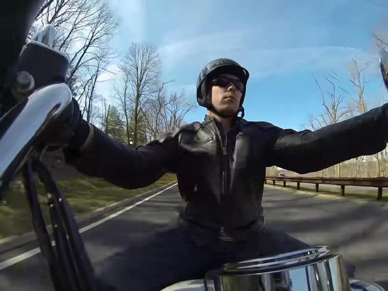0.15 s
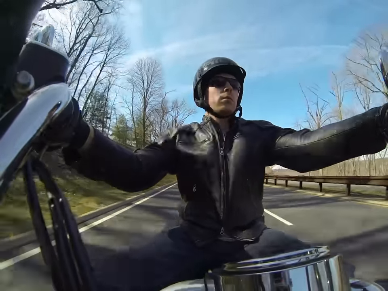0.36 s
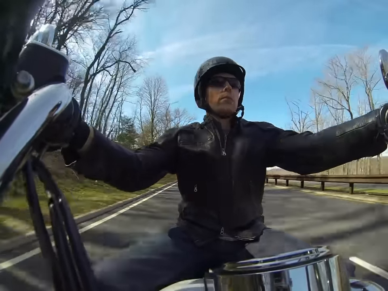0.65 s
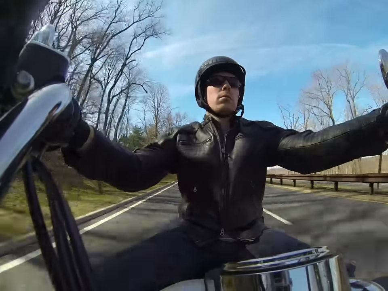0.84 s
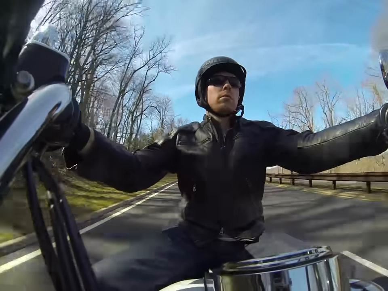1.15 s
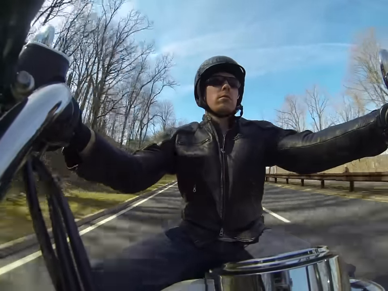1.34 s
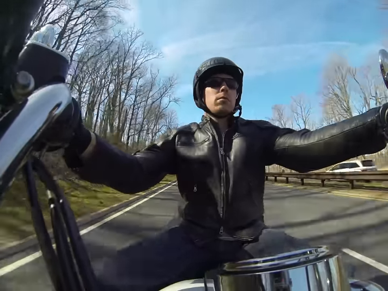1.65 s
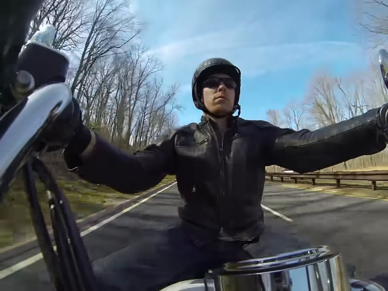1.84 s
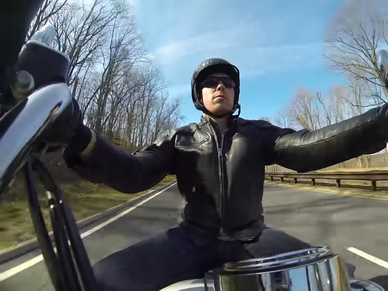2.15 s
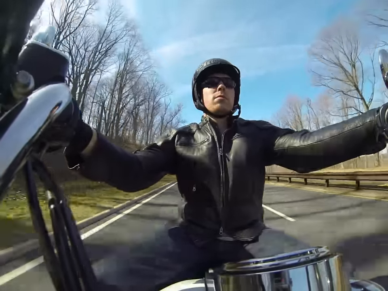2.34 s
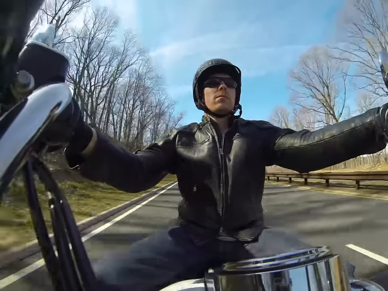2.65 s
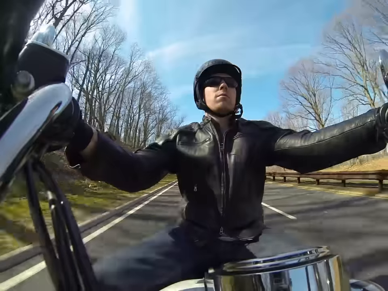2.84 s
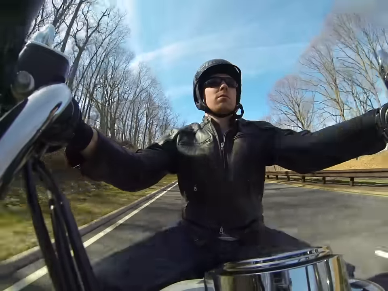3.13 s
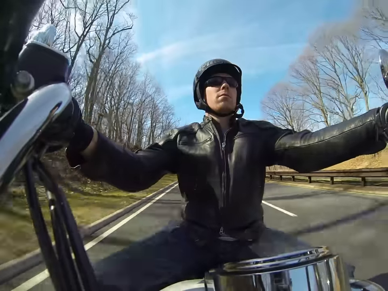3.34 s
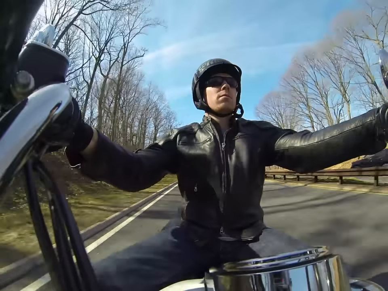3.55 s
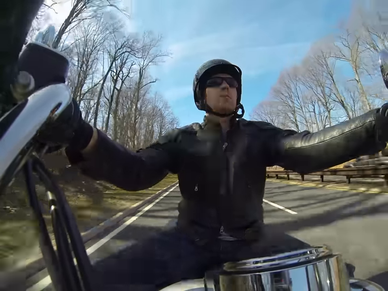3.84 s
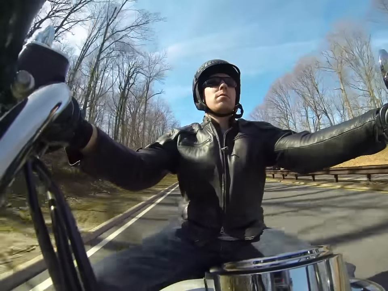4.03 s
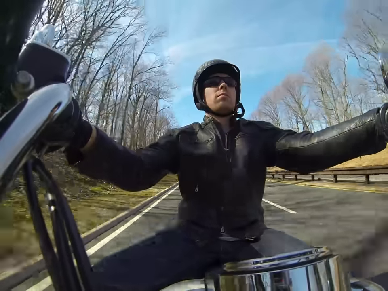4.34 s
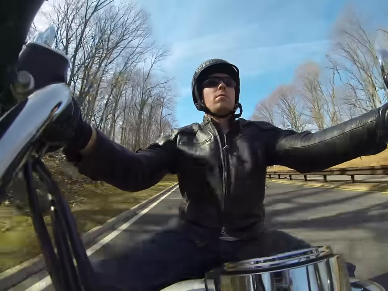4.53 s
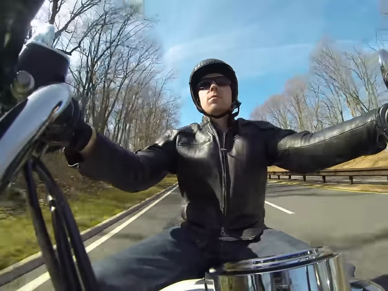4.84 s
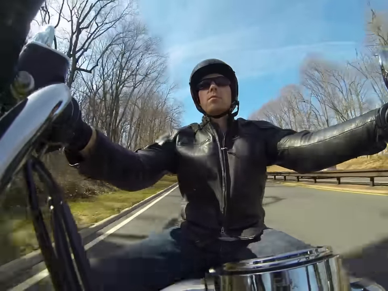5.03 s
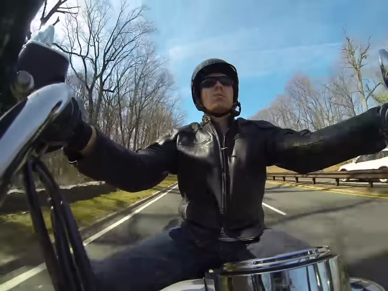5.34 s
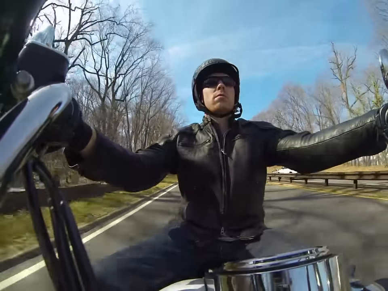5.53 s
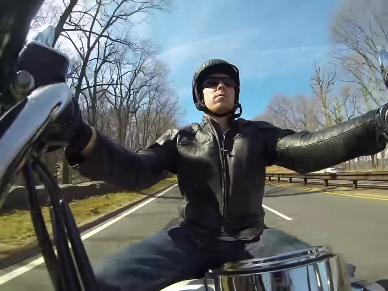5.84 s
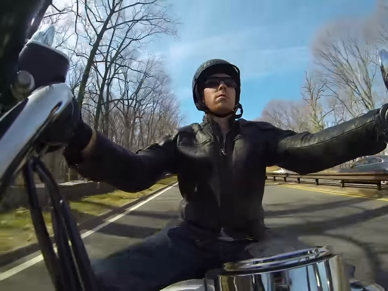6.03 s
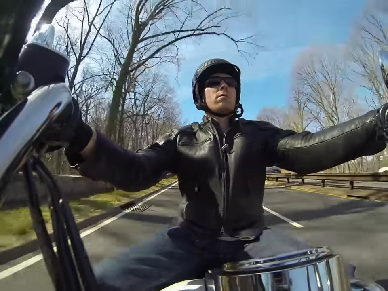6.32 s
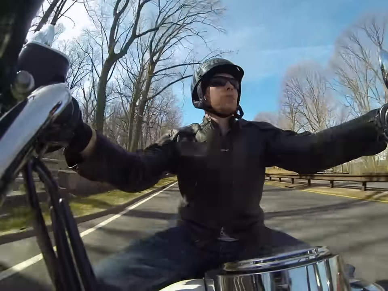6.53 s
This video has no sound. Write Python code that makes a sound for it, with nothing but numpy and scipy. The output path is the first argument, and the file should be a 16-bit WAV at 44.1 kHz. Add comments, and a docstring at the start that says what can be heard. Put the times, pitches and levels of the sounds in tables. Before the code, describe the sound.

A twin-cylinder motorcycle runs on an open road, heard from a small sealed microphone on the handlebar. It coasts and slows slightly, then the throttle opens and the uneven exhaust throb grows stronger before easing off. Wind roar and hollow valve clatter continue throughout, and low jolts from road joints shake the bar near the end.

```python
"""A V-twin motorcycle on a road, heard by a small microphone in a sealed housing on the handlebar.
It coasts and slows, pulls under opened throttle, eases off, and slows over jolting joints.
Throughout, two uneven firings a cycle excite pipe and frame resonances, and engine orders shake the bar.
Wind noise and valve knocks ring the housing modes, coloured noise roars, and low hums swell and beat.
A gain control ducks loud swings, above all of the bass; the housing dulls the treble."""
import sys
import numpy as np
from scipy import signal
from scipy.fft import rfft, irfft
from scipy.io import wavfile
from scipy.ndimage import uniform_filter1d

SR = 44100
rng = np.random.default_rng(int(sys.argv[2]) if len(sys.argv) > 2 else 0)


def wav_out(sig):
    """Save sig, one row per channel (or a flat mono array), as 16-bit PCM at SR to the path in sys.argv[1]."""
    wavfile.write(sys.argv[1], SR, np.round(np.clip(np.atleast_2d(sig).T, -1, 1) * 32767).astype(np.int16))


N = 294588

# Source levels are those ahead of the gain control.
# whines of gear teeth: (multiple of the cycle rate)
GEAR_ORDERS = (42, 72, 77)


def amp(db):
    """Level to amplitude ratio: 20 dB is a factor of ten."""
    return 10 ** (np.asarray(db) / 20)


def rms_one(x):
    """Normalization to unit root-mean-square amplitude."""
    return x / np.sqrt(np.mean(x ** 2) + 1e-20)


def in_time(rows):
    """Linear interpolation of each column of a table over time."""
    times, *columns = np.transpose(rows)
    return [np.interp(np.arange(N) / SR, times, column) for column in columns]


def drift(corner_hz):
    """Slow random modulation of spread 1: noise at every 40th sample through a double one-pole low-pass."""
    r = np.exp(-80 * np.pi * corner_hz / SR)
    noise = rng.standard_normal(N // 40 + 2002)
    slow = signal.lfilter([1], [1, -2 * r, r * r], noise)[2000:]   # settled part
    return np.interp(np.arange(N) / 40, np.arange(len(slow)), rms_one(slow))


def swell(middle_s, length_s):
    """Raised-cosine envelope: rises smoothly from 0 to 1 and falls back."""
    place = (np.arange(N) / SR - middle_s) / length_s
    return np.cos(np.pi * np.clip(place, -.5, .5)) ** 2


def resonate(x, hz, width_hz):
    """Damped resonance: a pole pair with unit gain at its peak, damping set by the bandwidth."""
    r = np.exp(-np.pi * width_hz / SR)
    zeros = [(1 - r * r) / 2, 0, (r * r - 1) / 2]
    poles = [1, -2 * r * np.cos(2 * np.pi * hz / SR), r * r]
    return signal.lfilter(zeros, poles, x)


def each_cycle(cycles, place, spread_db, jitter_s):
    """Quasi-periodic impulses: one click a cycle, each a little off in strength and time."""
    at = np.searchsorted(cycles, np.arange(int(cycles[-1])) + place % 1)
    chance = rng.standard_normal((len(at), 2)).clip(-2, 2)
    at = at + (jitter_s * SR * chance[:, 0]).astype(int)
    clicks = np.full(N, 1e-18)
    clicks[np.clip(at, 0, N - 1)] = amp(spread_db * chance[:, 1])
    return clicks


def in_stages():
    """Piecewise-steady operation: every column holds through its stage, then moves linearly to the next."""
    # coasting, slowing ends, throttle opens, pulling, easing off, light throttle, slowing:
    # (start [s], exhaust pop [dB], second cylinder's pop re first [dB], frame ring [dB],
    # second blow re first [dB], orders 2, 3, 4, 5, 42, 72 and 77 [dB each], housing noise [dB],
    # its modes away from 1350 Hz [dB per octave])
    stages = [(0, -33, -7, -22, -1, -35, -36, -21, -44.5, -42.5, -27, -49.5, -19.5, 1.5),
              (.75, -31, -5, -18.5, 1.5, -34, -39, -22, -44, -37, -31, -45.5, -18.5, 2.5),
              (1.25, -27, -5, -26.5, -3, -34, -31, -25, -40, -40, -53, -53, -22.5, 1.4),
              (1.651, -23, -7, -19.5, -3.5, -35, -26.5, -30, -34.5, -43, -42.5, -38, -19, 2.3),
              (4.101, -24.5, -6, -30.5, -4, -38, -27, -23, -38, -39, -35.5, -33.5, -19.5, 2.8),
              (4.902, -25.5, -12, -31, 2, -42, -30, -20, -35, -37, -53, -42, -18.5, 1.9),
              (5.799, -26, -12, -33, 2, -41, -30, -18, -33, -39, -53, -45, -19.5, 2.4)]
    change_s = 0.18   # the blend ends as the next stage starts
    ends = [row[0] - change_s for row in stages[1:]] + [N / SR]
    rows = []
    for row, end in zip(stages, ends):
        rows.append(row)
        rows.append((max(end, row[0] + .01), *row[1:]))
    return in_time(rows)


def roar():
    """Broadband turbulence and tyre noise: white noise spectrally coloured on a log-frequency axis."""
    # wind and tyre roar between the modes: (frequency [Hz], relative spectral level [dB])
    spectrum = [(12, -7.5), (24, -10), (45, -18.5), (61, -3.5), (78, -16.5), (108, -20.5), (140, -18),
                (290, -19), (520, -21), (620, -39.5), (750, -32.5), (1010, -40), (1370, -17), (2400, -50),
                (4600, -63)]
    hz, db = np.transpose(spectrum)
    grid = np.maximum(np.arange(N // 2 + 1) * SR / N, 1)
    colour = amp(np.interp(np.log(grid), np.log(hz), db, left=-40, right=-120))
    noise = irfft(rfft(rng.standard_normal(N)) * colour, N)
    return rms_one(noise) * amp(2.5 * drift(6.0))


def housing(cycles, tilt_db):
    """Modal superposition: wind noise rings every mode; valve knocks strike the middle modes each cycle."""
    # valve gear: (place in the cycle [0-1], knock into low, middle and upper mode groups [dB each])
    valves = [(.02, 0, -8, -12), (.31, -8, -1, -9), (.42, 1, -20, -20), (.625, -4, 0, -12),
              (.8, -8, -5, -4)]
    # edges of those three groups of modes: (frequency [Hz])
    group_edges = (600, 1000, 1700, 2400)
    # housing modes: (frequency [Hz], width of the first resonance pass [Hz], relative gain [dB])
    modes = [(292, 60, -2), (445, 85, -13.5), (762, 87, -14.5), (900.7, 92, -13.5), (1178, 150, -16),
             (1270, 55, -3), (1325, 70, -3), (1385, 90, 0), (1527.5, 130, -12), (2009, 152, -14),
             (2148, 124, -17), (2769, 210, -22), (3335, 320, -31.5), (3822, 100, -37), (4240, 130, -38),
             (5046, 440, -41.5), (5600, 590, -45), (7200, 620, -29.5), (7670, 76, -22)]
    decay_s, spread_db, jitter_s = .003, 2.5, .00003
    knock_gain_db, rattle_db = 24, 1   # knock, and its rattling tail on the wind noise

    fade = np.exp(-1 / (decay_s * SR))
    clicks = np.array([each_cycle(cycles, row[0], spread_db, jitter_s) for row in valves])
    group_knocks = amp(np.array(valves)[:, 1:]).T @ clicks
    knocks = [np.zeros(N), *group_knocks, np.zeros(N)]   # none below or above the groups
    white, gust, out = rng.standard_normal((3, N)), drift(27.0), 0
    for k, (hz, width, db) in enumerate(modes):
        knock = knocks[np.searchsorted(group_edges, hz)]
        rattle = 1 + amp(rattle_db) * signal.lfilter([1], [1, -fade], knock + 1e-18)
        flutter = amp(0.67 * gust + 0.5 * drift(16.0))   # shared and own parts
        wind = white[k % 3] * rattle * flutter
        force = wind + amp(knock_gain_db) * knock * (-1) ** k   # neighbours move in opposite sense
        gain = amp(db + tilt_db * abs(np.log2(hz / 1350)))
        out = out + gain * resonate(resonate(force, hz, width), hz, 0.93 * width)   # twice: steep skirts
    return rms_one(out)


def faint_clicks():
    """Impulse response: each faint short click is one impulse ringing briefly near 3.2 kHz."""
    # faint short clicks: (time [s], peak level [dB])
    click_table = [(1.4942, -32), (1.737, -30), (1.7736, -26.5), (1.8494, -32), (1.962, -31), (2.1557, -31),
                   (2.227, -30), (2.5218, -37), (2.7433, -37), (2.842, -29), (2.9548, -33), (3.2696, -33),
                   (3.3954, -30), (3.5101, -32), (3.6213, -30), (3.7341, -41), (3.8563, -34), (3.911, -31)]
    centre_hz, width_hz = 3236, 300
    times, peak_db = np.transpose(click_table)
    impulses = np.full(N, 1e-18)
    # this factor and e set the peak of the double resonance
    impulses[(times * SR).astype(int)] = amp(peak_db) * SR / (2 * np.pi * width_hz)
    return np.e * resonate(resonate(impulses, centre_hz, width_hz), centre_hz, width_hz)


def jolts():
    """Transient free vibration: each joint kicks the bar's low mode downward first; it rings out."""
    # joints in the road jolt the bar: (time [s], level before rise and decay [dB])
    joints = [(5.366, -8), (5.548, -15), (5.891, -10.5), (6.461, -15)]
    mode_hz, width_hz, rise_s = 61, 4, .004
    since = np.maximum(np.arange(N) / SR - np.array(joints)[:, :1], 0)
    envelope = (1 - np.exp(-since / rise_s)) * np.exp(-np.pi * width_hz * since)
    return -amp(np.array(joints)[:, 1]) @ (envelope * np.sin(2 * np.pi * mode_hz * since))


def low_hum_swells():
    """Beating: low hum swells near 59-67 Hz overlap and interfere with the fourth engine order."""
    # low hum swells: (middle [s], length [s], frequency [Hz], RMS level at the top before drift [dB])
    hums = [(.3441, 1.0, 65, -18.5), (.7514, 1.0, 59, -25.5), (1.6125, 1.0, 60.5, -19),
            (2.5108, 1.0, 66, -23.5), (2.9461, .7, 61, -23), (3.3772, .45, 63, -22),
            (3.8192, .45, 59, -18.5), (3.8343, 1.0, 66.5, -24), (4.5437, 1.0, 66, -19),
            (4.7192, .7, 62.5, -21.5), (5.1392, .3, 59.5, -22), (5.3657, 1.0, 65.5, -18.5),
            (5.7043, .3, 65, -21), (6.3187, 1.0, 65, -24.5)]
    t = np.arange(N) / SR
    total = 0
    for middle, length, hz, db in hums:
        total = total + amp(db) * swell(middle, length) * np.cos(2 * np.pi * hz * (t - middle))
    return np.sqrt(2) * amp(1.4 * drift(9.1)) * total


def shaking(cycles, order_db):
    """Harmonic forcing: pure multiples of the cycle rate are carried through the bar."""
    # order: angle at the start [turns]
    start_turns = {2: .1, 3: .45, 4: .29, 5: .2, 10: .15, 42: .2, 72: .1, 77: .1}
    total = 0
    for order, db in order_db.items():
        turns = order * cycles + start_turns[order]
        total = total + np.sqrt(2) * amp(db) * np.cos(2 * np.pi * turns)
    return total


def firings(cycles, pop_db, second_db, ring_db, second_blow_db):
    """Pulse-excited resonance: firings pop through pipe modes and, a moment later, swell up in frame modes."""
    # the two firings as heard at the bar: (pop place in the cycle [0-1], frame blow place [0-1])
    firing_places = [(.146, .19), (.685, .69)]
    # exhaust pipe modes: (frequency [Hz], width [Hz], relative gain [dB])
    pipe_modes = [(140, 60, -1), (190, 90, 5), (235, 55, 4), (352, 80, -2), (428, 80, 2.5), (467, 50, 3),
                  (515, 60, -7)]
    # frame modes: (frequency [Hz], width of the first resonance pass [Hz], relative gain [dB])
    frame_modes = [(289, 18, 6), (323, 17, -2)]
    spread_db, jitter_s = 1.8, .0001
    # above this the pop is a bright crack: earlier, echoed once from the pipe end, weaker in the second cylinder
    crack_from_hz, crack_lead_s, second_crack_db = 300, .0015, -8
    echo_s, echo_db = 0.00857, -10.5

    first, second = (each_cycle(cycles, pop, spread_db, jitter_s) for pop, _ in firing_places)
    puffs = first + amp(second_db) * second
    cracks = first + amp(second_db + second_crack_db) * second
    cracks = np.roll(cracks, -int(crack_lead_s * SR))
    cracks = cracks + amp(echo_db) * np.roll(cracks, int(echo_s * SR))
    first, second = (each_cycle(cycles, blow, spread_db, jitter_s) for _, blow in firing_places)
    blows = first + amp(second_blow_db) * second

    pop = 0
    for hz, width, db in pipe_modes:
        source = cracks if hz > crack_from_hz else puffs
        pop = pop + amp(db) * resonate(source, hz, width)
    ring = 0
    for hz, width, db in frame_modes:
        ring = ring + amp(db) * resonate(resonate(blows, hz, width), hz, 5.3 * width)
    soft = signal.butter(6, 545, fs=SR, output="sos")   # gas pulses have no sharp front
    return signal.sosfilt(soft, amp(pop_db) * rms_one(pop) + amp(ring_db) * rms_one(ring))


def scene():
    """Linear superposition of engine, low hums, jolts, air noise and faint clicks."""
    # engine speed: (time [s], four-stroke cycle rate [Hz]); the crank turns twice a cycle
    speed = [(0, 18.808), (.95, 18.056), (1.43, 18.066), (1.9, 17.85), (3.85, 18.042), (6.68, 17.397)]
    # shaking at an unchanging level: order: RMS level [dB]
    steady_orders = {10: -42}
    # orders whose levels follow the stages: (multiple of the cycle rate)
    stage_orders = (2, 3, 4, 5, *GEAR_ORDERS)
    # gusts on the housing: (middle [s], length [s], rise at the middle [dB])
    gusts = [(1.5, 0.68, 5), (4.212, 1, 3)]
    roar_db = -26

    cycles = np.cumsum(in_time(speed)[0]) / SR
    pop_db, second_db, ring_db, second_blow_db, *order_db, housing_db, tilt_db = in_stages()
    housing_db = housing_db + sum(db * swell(middle, length) for middle, length, db in gusts)
    orders = dict(zip(stage_orders, order_db))
    for order in GEAR_ORDERS:   # the teeth load and unload with the slack of the drive
        orders[order] = orders[order] + 3 * drift(12.0)
    engine = firings(cycles, pop_db, second_db, ring_db, second_blow_db)
    engine = engine + shaking(cycles, {**steady_orders, **orders})
    air = amp(housing_db) * housing(cycles, tilt_db) + amp(roar_db) * roar()
    return (engine + low_hum_swells() + jolts() + air + faint_clicks())[None]


def record(dry):
    """Nonlinear transduction: lopsided capsule, fast gain reduction with slow release, rounded peaks, cut top."""
    lopsided = 0.053   # the capsule swings further one way, which doubles the frequency of strong bass
    target_db, share = -7.5, 0.83   # detector level aimed at, part of the deviation removed
    release_db_s, attack_s = 42.5, 0.00095   # detector fall [dB/s], gain smoothing [s]
    extra_bass_db = -12   # level of the bass added again in the detector
    seal_hz, cutoff_hz = 4063, 8100   # the sealed housing dulls all above the first; the top is cut at the second

    bass = signal.sosfilt(signal.butter(2, 110, fs=SR, output="sos"), dry[0])
    dry = dry + lopsided * (bass ** 2 - uniform_filter1d(bass ** 2, size=2000))
    level_db = 20 * np.log10(np.abs(dry[0] + amp(extra_bass_db) * bass) + 1e-6)
    ramp = release_db_s * np.arange(N) / SR
    held_db = np.maximum.accumulate(level_db + ramp) - ramp   # peak hold falling at the release rate
    r = np.exp(-1 / (attack_s * SR))
    wanted_db = share * (target_db - held_db).clip(-30, 3)
    gain_db = signal.lfilter([1 - r], [1, -r], wanted_db)
    wet = 1.137 * np.tanh(dry * amp(gain_db + 3.5) / 1.332)   # 3.5 dB make-up gain, soft peaks
    wet = signal.sosfilt(signal.butter(5, seal_hz, fs=SR, output="sos"), wet)
    return signal.sosfilt(signal.cheby2(18, 50, cutoff_hz, fs=SR, output="sos"), wet)


dry = scene()
out = record(dry)
wav_out(out)
```